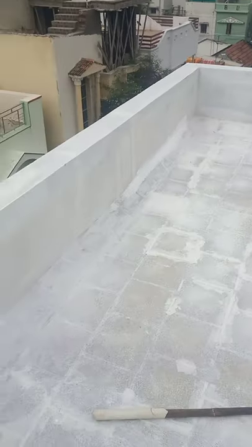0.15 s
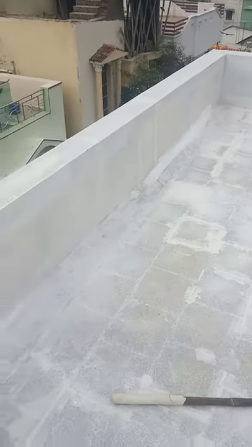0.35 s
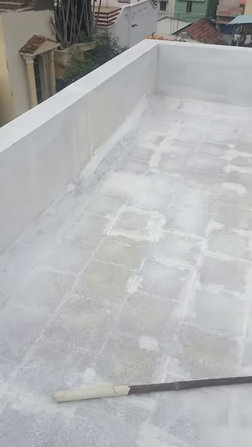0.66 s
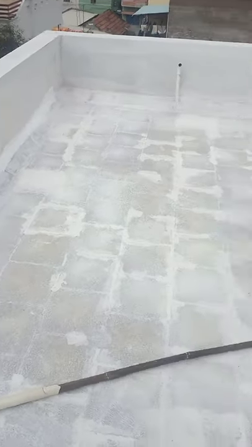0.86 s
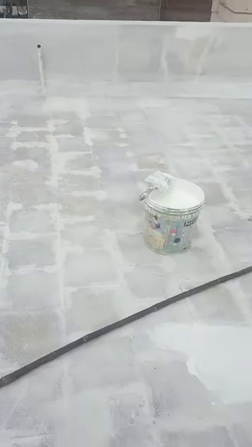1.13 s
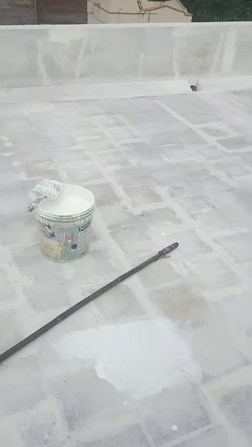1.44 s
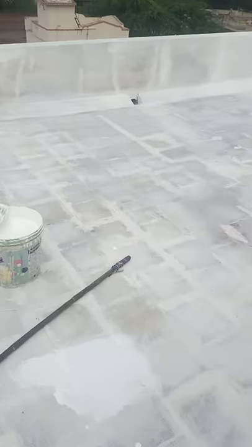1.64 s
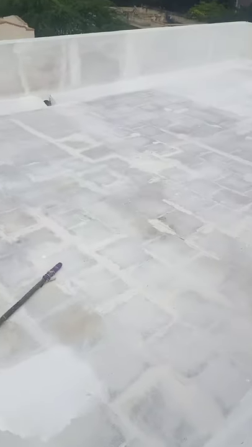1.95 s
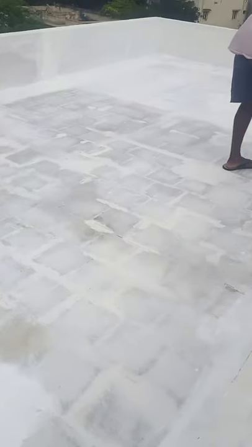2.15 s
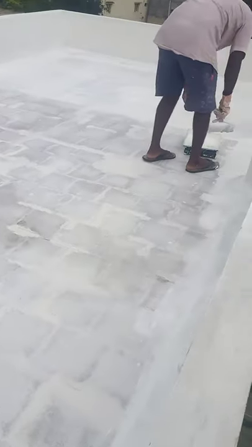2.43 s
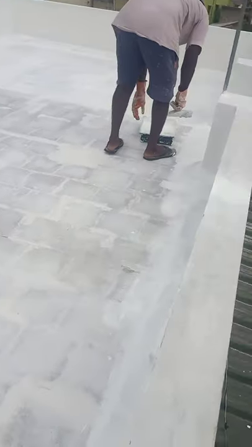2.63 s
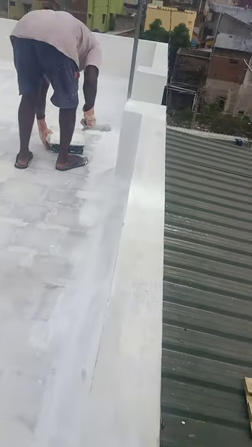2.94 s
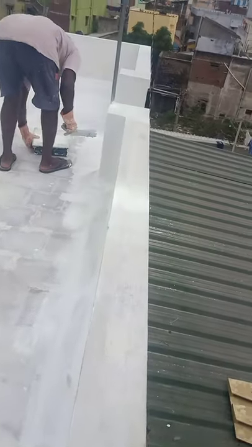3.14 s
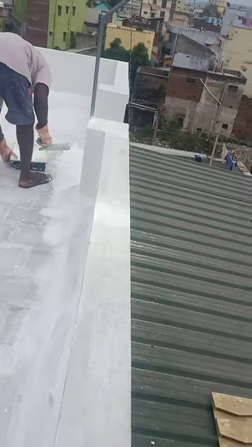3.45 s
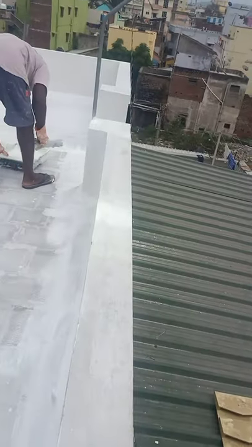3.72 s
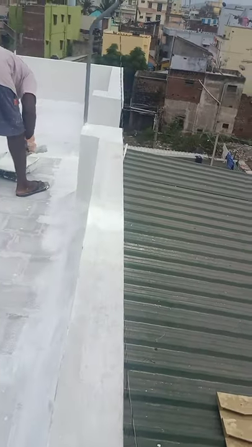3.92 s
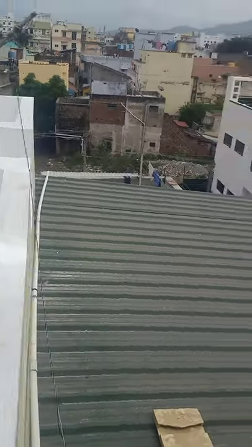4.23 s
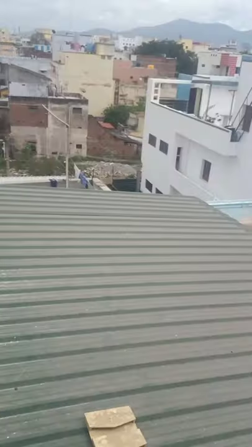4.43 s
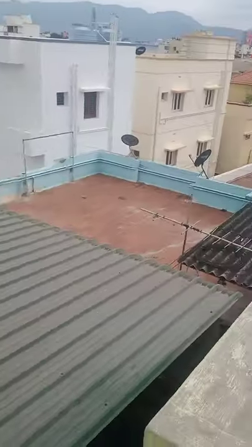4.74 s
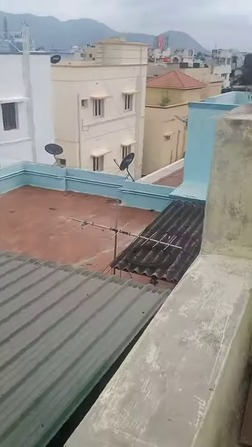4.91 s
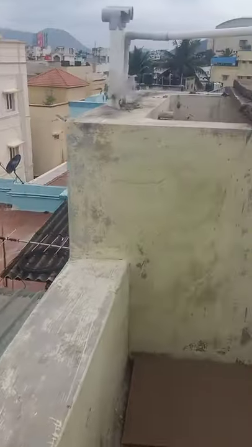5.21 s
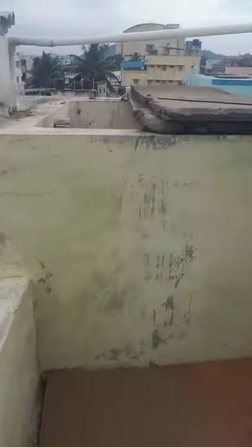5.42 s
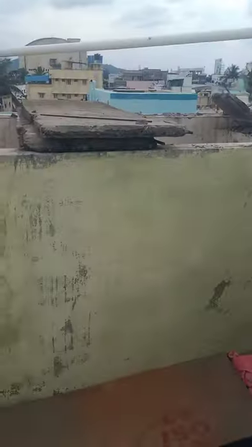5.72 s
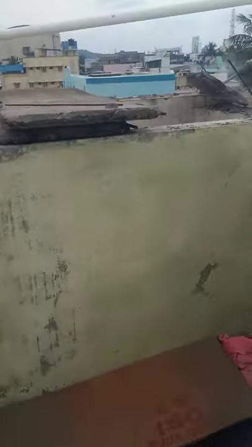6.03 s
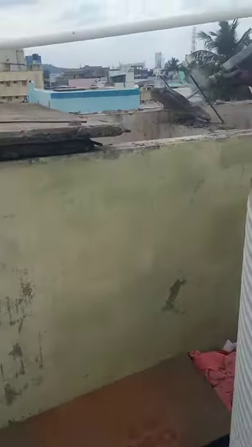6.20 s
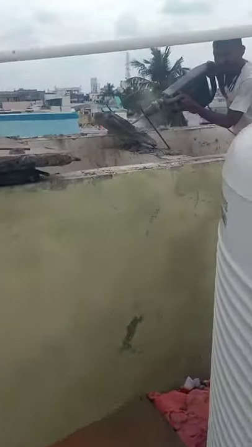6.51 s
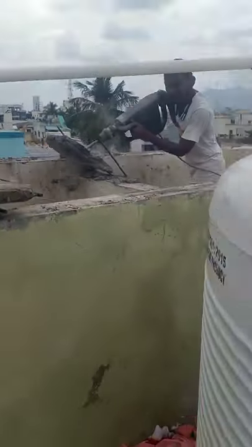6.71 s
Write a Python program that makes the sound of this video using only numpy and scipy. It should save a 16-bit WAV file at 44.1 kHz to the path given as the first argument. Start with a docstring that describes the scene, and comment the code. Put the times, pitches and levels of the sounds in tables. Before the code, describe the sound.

On a rooftop, a motor idles over a low traffic rumble and one faint bird chirp. An electric demolition hammer then chisels concrete nearby in a rapid burst of cracking, thumping blows. It drops back to a whirr, with a few dull footsteps and stray rattling strikes, before a second burst with a brighter steel ring fades away. The microphone moves across the roof, and walls throw back short echoes.

```python
"""An idling motor whirrs over a low traffic rumble and one bird chirp; then an electric demolition hammer
chisels concrete on a nearby roof, in two bursts with a few stray blows between. Each blow cracks,
thumps the slab and rings the steel chisel; gears, piston and fan run on and grow louder under load.
The listener crosses the roof with a few dull footfalls and turns from side-on to face the hammer.
Parapets and houses throw the sound back."""
import sys
import numpy as np
from scipy import signal
from scipy.fft import rfft, irfft, next_fast_len
from scipy.io import wavfile
from scipy.ndimage import uniform_filter1d, minimum_filter1d, map_coordinates

SR = 44100
rng = np.random.default_rng(int(sys.argv[2]) if len(sys.argv) > 2 else 0)


def put_to_file(sound):
    """Save the sound as 16-bit audio at rate SR, in the file named by the first command-line argument."""
    columns = np.atleast_2d(sound).T  # one column per channel
    safe = np.clip(columns, -1, 1)
    whole_steps = np.round(safe * 32767)
    wavfile.write(sys.argv[1], SR, whole_steps.astype(np.int16))


N = 302526
T = np.arange(N) / SR
CRANK_HZ, SHOCK_LAG_S = 24.3, 0.0007

# Table levels are relative; each source adds its own gain.
# blows (time [s], crack [dB], slab thump [dB], steel ring [dB], extra on top steel modes [dB])
BLOWS = [(1.1821, -15, -23.5, -39, 2), (1.2229, -15, -16.5, -29.5, -7), (1.263, -14, -13.5, -33, 0),
         (1.515, -19.5, -19, -35, -7), (1.553, -13.5, -13, -26.5, -4), (1.635, -12, -12, -30, -9),
         (1.6758, -7, -14.5, -25, -5.5), (1.7615, -10.5, -16, -39, -2.0), (1.7987, -5, -13.5, -31.5, 2),
         (1.881, -5.5, -12, -35, 1), (1.9644, -3, -13, -26, -7), (2.004, -3.5, -12.5, -35, 7),
         (2.0451, -3, -13.5, -35, 0.0), (2.0871, -4.5, -14.5, -28, 3), (2.1292, -5, -14, -34, 3),
         (2.1702, -5.5, -18, -23, -7), (2.2106, -4, -15.5, -37, 5), (2.2532, -7, -20.5, -38, 4),
         (2.2932, -4, -19, -38, -5), (2.3356, -6.5, -17.5, -32, -2), (2.3759, -5.5, -17, -35, -6),
         (2.4163, -5, -17.5, -30, -5), (2.4584, -6, -25, -27, -5), (2.5002, -7, -22, -28, -12),
         (2.5434, -11.5, -19, -31, -5), (2.5833, -9.5, -23, -31.5, 2), (2.6248, -9, -25, -35, 10),
         (2.6663, -11.5, -23, -39, 7), (2.7078, -12.0, -24, -34, 0), (2.7502, -16, -27, -31, -2),
         (2.805, -23.5, -56, -44.0, -2), (4.0269, -18, -45, -60.0, -5.0), (4.0648, -17, -52, -44, -4),
         (4.1074, -12, -22.5, -43.0, 4), (4.15, -8, -28, -26, 5), (4.1995, -27, -38, -34, 0),
         (4.265, -21.5, -37, -32.5, 2), (5.314, -16.5, -52, -22, -6), (5.3821, -11, -19.5, -22.5, -3),
         (5.4252, -9, -20, -20.5, 1), (5.4656, -8.5, -17.5, -18.5, -1), (5.505, -6, -16, -18.5, 3),
         (5.5465, -7.5, -17, -16, -3), (5.5876, -4, -18.5, -24, 8), (5.6282, -5.5, -19, -19.5, 3.5),
         (5.6707, -8, -20, -22.5, 2.5), (5.7118, -5, -21.5, -25.5, 2), (5.7525, -9.5, -19, -20.5, 3),
         (5.7937, -8, -17, -19, 5.0), (5.8382, -10.5, -18.5, -22.5, -3), (5.8765, -7, -18, -15.5, -3),
         (5.917, -6.5, -19.5, -24, 3), (5.9579, -7, -20.5, -23.5, 4), (5.9995, -5.5, -19.5, -20, -2),
         (6.0405, -5.5, -22, -22, -3), (6.0817, -5.5, -21.5, -21, -1), (6.1238, -6.5, -23, -23.5, 2),
         (6.165, -6.5, -26, -30, 3.0), (6.2059, -6.5, -24, -26.5, -1), (6.2478, -7.5, -25.5, -28, -2),
         (6.289, -8.5, -27, -31, -3), (6.3302, -8, -25, -30, -3), (6.372, -11, -26, -35, 4),
         (6.4126, -13.5, -30, -26.5, -4), (6.4544, -13.5, -29, -30, -6), (6.4951, -15, -38, -35, 0),
         (6.5374, -17.5, -29, -31.5, -1.0), (6.5783, -17, -32, -30, 1), (6.6204, -16.5, -37, -34, 7),
         (6.6589, -21, -43, -33, 1), (6.7021, -23.5, -38, -36, 1), (6.744, -21.5, -40, -36, -2),
         (6.786, -22.5, -39, -37, 1), (6.8236, -18, -44, -37, 0)]
# direct shock, side-on and facing (frequency [Hz], level [dB])
SHOCK_SIDE = [(30, -49), (150, -15), (600, -4), (1200, -0.5), (2000, 0.5), (2700, -2), (3400, -24),
              (5500, -23), (6600, -12), (8200, -42), (15500, -60)]
SHOCK_FRONT = [(30, -53), (150, -17.5), (500, -4), (780, 1), (1050, -3), (1500, -8), (2000, -7),
               (2800, -4.5), (3400, -8), (4200, -18), (6600, -12), (8200, -33), (15500, -48)]
# shock gain, highest where the path is clear (time [s], gain [dB])
SHOCK_PATH = [(1.2, 12.5), (2, 8.5), (2.3, 4), (2.45, 12.5), (2.62, 15.5), (2.75, 11), (4.1, 6), (4.15, 10),
              (4.26, 4), (5.4, 5), (5.8, 6.5), (6.05, 8), (6.2, 12), (6.35, 12), (6.8, 0.5)]
# crack, side-on and facing (frequency [Hz], level [dB])
CRACK_SIDE = [(100, -48), (400, -6), (800, 1.5), (1100, 5), (1450, -3), (2000, -2), (2800, 0.5),
              (3600, -13.5), (5000, -16), (7000, -23), (8200, -51), (11000, -36.5), (15500, -68)]
CRACK_FRONT = [(100, -53), (400, -10), (780, 8), (1100, 2), (1400, 6.5), (1850, 7), (2300, 2.5), (2750, 6),
               (3400, -1.5), (4100, -9), (6800, -4), (8200, -23.5), (11000, -37), (15500, -35)]
# hollow note knocked out by each snap (time [s], pitch [Hz], gain [dB])
CLANK_NOTE = [(1.2, 630, 0), (1.7, 565, -4), (2.1, 620, -13), (2.6, 1040, -13), (4.1, 1060, -5),
              (5.4, 920, 2.5), (5.7, 890, 1.5), (5.88, 880, 1), (6.03, 750, -2.5), (6.35, 770, -3),
              (6.8, 930, -3)]
# slab and wall modes, side-on and facing (frequency [Hz], level [dB], t60 [s])
SLAB_MODES_SIDE = [(145, -17, .13), (245, -11, .09), (382, -7, .08), (455, -6, .09), (488, -8, .08),
                   (560, -4, .075), (605, -4, .07), (672, -10, .07), (772, -7, .08), (980, -3, .045),
                   (1120, -3, .08), (1285, -8, .05), (1455, -8, .07), (1718, -6, .07), (2260, -8, .06),
                   (2735, -9, .05)]
SLAB_MODES_FRONT = [(145, -13, .13), (216, -8, .08), (243, -2.5, .08), (342, -4, .08), (460, -5, .08),
                    (530, -9, .07), (652, -5, .06), (735, -6, .06), (775, -2, .035), (890, -5, .03),
                    (950, -4, .03), (1230, -3, .06), (1510, -9, .07), (1795, -5, .05), (1950, -6, .045),
                    (2370, -10, .045), (2690, -8, .04)]
# wall thud (level [dB], start pitch [Hz], floor pitch [Hz], envelope centre [s], width [s])
THUD_SIDE, THUD_FRONT = (-6, 350, 190, -0.2, 0.08), (-9, 330.5, 205.5, 0.28, 0.6)
# steel modes (frequency [Hz], level [dB], t60 [s])
CHISEL_MODES = [(5167, -7, .045), (5550, -9, .02), (5695, 1, .05), (5890, -5, .025), (6490, -4, .03),
                (6700, -3, .025), (6950, -10, .018), (8450, -24, .02), (9080, -7, .04), (10100, -15, .032),
                (10330, -24, .018), (11350, -28, .015), (13020, -16.5, .043), (13800, -25, .02),
                (14550, -26, .02)]
# chisel loose in its holder (time [s], level [dB], width [s], pitch [Hz])
RATTLES = [(1.333, -35, 0.0084, 620), (1.547, -28, 0.0055, 1000), (1.635, -26, 0.0049, 1000),
           (1.67, -21.5, 0.0045, 1050), (1.721, -35, 0.0045, 895), (1.76, -24, 0.0066, 1000),
           (1.792, -26, .006, 1050), (1.848, -23, 0.0061, 950), (1.879, -27, .005, 1050),
           (1.925, -30, 0.0065, 1090), (1.96, -21, 0.004, 1010), (4.104, -24, 0.0057, 995),
           (4.184, -25.5, .014, 1090), (4.246, -28, 0.0087, 850), (4.281, -25, 0.014, 1150),
           (4.304, -27.5, 0.0055, 700), (4.346, -33, 0.0044, 850), (4.359, -26.5, 0.0051, 850),
           (4.4, -27.5, .006, 1000), (4.441, -29.5, 0.0071, 800), (4.481, -27.5, 0.0087, 790),
           (4.524, -30.5, 0.0042, 740), (4.564, -31, .005, 1200), (4.644, -32, 0.0062, 756),
           (4.68, -29.5, 0.0072, 720)]
# tip skidding and grinding (frequency [Hz], level [dB])
SKID_SPECTRUM = [(6000, -2), (7400, 12.5), (8300, -1), (9100, 2), (9700, -10), (10200, -4), (11200, -12.5),
                 (12200, -21), (13100, -9), (13900, -5), (15500, -11)]
GRIND_SPECTRUM = [(500, -14), (1000, 3), (1500, -21), (2000, -6), (4000, 10.5), (5700, 8.5), (6800, 12),
                  (8000, -10.5), (9200, -23), (10300, -12), (12000, -29), (14000, -17), (15500, -23)]
# unloaded machine (time [s], whirr [dB], hum [dB], fan hiss [dB])
IDLE_LEVELS = [(0, -36, -51, -52.5), (.5, -35.5, -54, -50.5), (.85, -34.5, -50.5, -46),
               (1.4, -32.5, -37.5, -43.5), (2.9, -39, -71, -48), (3.65, -37, -49.5, -44.5),
               (3.9, -36.5, -55, -43.5), (4.02, -34, -69, -44), (4.17, -28.5, -53, -36.5),
               (4.35, -32, -39.5, -39), (4.65, -32, -42.5, -41.5), (4.9, -31, -36, -35.5),
               (5.27, -30.5, -42.5, -35.5), (5.55, -26, -35.5, -39), (6, -28.5, -45, -45),
               (6.55, -40, -51, -42), (6.86, -35.5, -77, -46.5)]
# noise added by load, side-on and facing (whirr [dB], hum [dB], fan hiss [dB])
LOAD_SIDE_DB, LOAD_FRONT_DB = (-15, -22, -30.5), (-19, -30, -53)
# gear whirr: idling far, idling near, loaded, facing (frequency [Hz], level [dB])
WHIRR_FAR = [(240, -67), (400, -21), (539, -2.5), (600, -10), (706, -2), (1200, -6), (1630, -9.5),
             (1780, -10), (2120, -12.5), (2380, -14), (3700, -20), (4000, -19.5), (5200, -32.5),
             (8800, -120)]
WHIRR_NEAR = [(240, -47), (400, -8), (485, -65), (514, -10), (648, 2.5), (925, -3), (1120, 5.5),
              (1360, -1.5), (1820, 1), (3400, -5.5), (4000, -11), (5200, -17.5), (8800, -120)]
WHIRR_LOADED = [(240, -11), (400, -6.5), (499, -34), (611, 5), (785, -12), (980, 1), (1130, -4.5),
                (1300, -2), (1620, -4), (2300, -4.5), (2900, -7.5), (3300, -17), (4000, -18), (5200, -38),
                (8800, -120)]
WHIRR_FRONT = [(240, -60), (400, -39), (453, -8.5), (588, -5.5), (660, -1), (780, 0), (900, -2),
               (1130, 1.5), (1300, -2), (1500, -2), (1600, -11.5), (1850, 3), (2270, -4.5), (3000, -5),
               (4000, -9), (5200, -21), (8800, -120)]
# machine hum, side-on and facing (frequency [Hz], level [dB])
HUM_SIDE = [(20, -49), (45, -65), (72, -6), (86, -3.5), (110, 0), (160, 1.5), (240, 5), (290, 2.5),
            (400, 3), (550, 6.5), (800, -44.5)]
HUM_FRONT = [(20, -60), (50, -50), (73, -34), (100, -32), (125, -14), (145, 2), (180, 2), (240, 10),
             (290, 2), (350, 5.5), (450, 5.5), (800, -48)]
# cooling fan, rush and top fizz (frequency [Hz], level [dB])
FAN_HISS = [(2200, 5.5), (3200, 14.5), (3700, -3), (4700, 3.5), (5500, -0.5), (6200, 3), (6700, 4),
            (7300, -7.5), (7900, -20.5), (9000, -60)]
FAN_FIZZ = [(6500, -30), (8000, 0), (9100, 1), (9700, -5), (10200, 0), (11500, -6), (13000, -4),
            (15500, -9)]
# heel and sole impacts (time [s], level [dB], boom [Hz], t60 [s])
FOOTFALLS = [(1.078, -31, 230, 0.1), (3.465, -21.5, 327, 0.14), (3.49, -21.5, 200, 0.1),
             (3.556, -30.5, 160, 0.081), (4.304, -23.5, 310, 0.079), (4.767, -11, 556, 0.082),
             (4.773, -13, 503, 0.12), (4.778, -24.5, 219, 0.19), (4.8, -17, 483, 0.073),
             (4.931, -19.5, 530, 0.026), (5.09, -24, 352, 0.071)]
# sole on grit (time [s], level [dB], decay [s])
SCUFFS = [(3.469, -25.5, 0.014), (3.477, -28.5, 0.034)]
# crunch of grit (frequency [Hz], level [dB])
SCUFF_SPECTRUM = [(300, -16), (700, 2), (1300, 5), (2500, -5), (3700, -5), (5200, -14), (7000, -25),
                  (8500, -44), (15500, -49)]
# bird note (time [s], pitch [Hz], level [dB])
CHIRP = [(.51, 3630, -83), (.525, 3640, -36.5), (.545, 3587, -33.5), (.565, 3644, -62), (.6, 3560, -84)]
# far traffic (time [s], level [dB])
TRAFFIC_LEVEL = [(0, -56), (.27, -57), (.4, -46), (.75, -42.5), (1.2, -50.5), (3.2, -56), (3.65, -54),
                 (3.92, -75), (4.2, -45), (4.8, -57.5), (6.86, -94)]
# its rumble (frequency [Hz], level [dB])
TRAFFIC_SPECTRUM = [(20, -26), (45, -39), (70, 2.5), (105, 13), (160, 1), (212, 12.5), (270, -28.5),
                    (400, -61.5)]
# nearest wall echoes (delay [s], level [dB], cutoff [Hz])
SLAPS = [(.0088, -5, 910), (0.0171, -11.5, 3150)]
# echo of the surrounding walls (frequency [Hz], t60 [s])
WALL_DECAY = [(150, 0.25), (600, 0.66), (2500, 0.35), (6000, 0.037), (12000, 0.2)]
# listener's heading (time [s], left lag [ms], left minus right [dB])
HEADING = [(0, -0.13, -1.5), (1.2, -0.21, -0.5), (1.7, -0.032, 0.9), (2.6, -0.047, -1.5), (3.7, -0.035, -3),
           (4.2, 0.044, -1.5), (4.7, 0.18, -2.5), (5.3, 0.19, -2), (6.2, 0.19, -2), (6.86, 0.13, -3)]
# left-right likeness of noise (frequency [Hz], coherence [0-1])
COHERENCE = [(30, 0.3), (130, 1), (350, 0.91), (700, 0.73), (1400, 0.73), (3000, 0.4), (8000, 0.01)]


def gain_of(db):
    """Decibels to amplitude."""
    return 10 ** (np.asarray(db) / 20)


def unit_rms(x):
    """Scales to an rms of one."""
    return x / np.sqrt(np.mean(x ** 2) + 1e-20)


def at_hz(points, hz):
    """Interpolates a spectrum over log frequency."""
    knots_hz, value = np.transpose(points)
    return np.interp(np.log(hz + 1), np.log(knots_hz + 1), value)


def at_time(rows, t):
    """Interpolates every column of a curve at times t."""
    knots_s, *columns = np.transpose(rows)
    return [np.interp(t, knots_s, column) for column in columns]


def add(mix, at_s, sound):
    """Mixes a sound in at a given time."""
    part = mix[:, max(round(at_s * SR), 0):][:, :sound.shape[1]]
    part += sound[:, :part.shape[1]]


def min_phase(points, size=2048):
    """Unit-energy minimum-phase response of a spectrum."""
    log_gain = at_hz(points, abs(np.fft.fftfreq(size, 1 / SR))) * np.log(10) / 20
    taps = np.fft.ifft(np.exp(np.conj(signal.hilbert(log_gain)))).real[:size // 2]
    return taps / np.linalg.norm(taps)


def facing(at_s):
    """Share of the hammer heard from the front, 0-1."""
    return np.clip((at_s - 3.2) / 1.8, 0, 1)


def panned(x, at_s):
    """Left-right delay and balance for the listener's heading."""
    lag_ms, balance_db = at_time(HEADING, at_s)
    side, hz = np.array([[.5], [-.5]]), np.fft.rfftfreq(x.shape[1], 1 / SR)
    delay_s = (side * lag_ms + abs(lag_ms) / 2) / 1000
    return irfft(rfft(x) * np.exp(-2j * np.pi * hz * delay_s), x.shape[1]) * gain_of(side * balance_db)


def cohere(spectra, hz):
    """Blends two independent spectra: alike in the bass, unrelated in the treble."""
    same = np.clip(at_hz(COHERENCE, hz), 0, 1)
    mid, side = spectra[0] * np.sqrt((1 + same) / 2), spectra[1] * np.sqrt((1 - same) / 2)
    return np.array([mid + side, mid - side])


def coloured(x, points):
    """Shapes a noise pair to a spectrum, at unit rms."""
    size = next_fast_len(x.shape[1])
    hz = np.fft.rfftfreq(size, 1 / SR)
    spectra = cohere(rfft(x, size), hz) * gain_of(at_hz(points, hz))
    return unit_rms(irfft(spectra, size)[:, :x.shape[1]])


def whitened(x, bins):
    """Flattens a burst's broad spectrum, at about unit energy."""
    spectra = rfft(x)
    power = uniform_filter1d(abs(spectra) ** 2, bins, axis=-1)
    return irfft(spectra / np.sqrt(power + 1e-12), x.shape[-1])


def flicker(size, depth_db, smooth_samples):
    """Randomly fluctuating gain."""
    return gain_of(depth_db * unit_rms(uniform_filter1d(rng.standard_normal(size), smooth_samples)))


def ring(modes, t, phase_turns, spread_db, rise_cycles, late_cycles=0):
    """Struck modes that build and decay, each at a slightly random strength."""
    hz, db, t60_s = np.transpose(modes)[:, :, None]
    strength = gain_of(db + spread_db * np.clip(rng.standard_normal(hz.shape), -2, 2))
    age_s = np.maximum(t - late_cycles / hz, 0)
    envelope = strength * np.exp(-np.log(1000) * age_s / t60_s) * (1 - np.exp(-age_s * hz / rise_cycles))
    return (np.exp(2j * np.pi * phase_turns[..., 0]) @ (envelope * np.exp(2j * np.pi * hz * t))).imag


def shocks():
    """Each blow's direct wave: one hard snap ahead of its reflections."""
    out, side, front = np.zeros((2, N)), min_phase(SHOCK_SIDE), min_phase(SHOCK_FRONT)
    for at_s, db, *_ in BLOWS:
        snap = -((1 - facing(at_s)) * side + facing(at_s) * front)
        gain = gain_of(db + at_time(SHOCK_PATH, at_s)[0])
        add(out, at_s + SHOCK_LAG_S, gain * panned(np.array([snap, snap]), at_s))
    return out


def cracks(gain_db=15.5, gap_s=0.0012, decay_s=0.003, scatter_db=-19, scatter_s=0.035, drift=0.22):
    """A sharp crack and a spray of near reflections whose pattern drifts as the listener moves."""
    t, out = np.arange(4096) / SR - .003, np.zeros((2, N))
    side, front, age_s = min_phase(CRACK_SIDE), min_phase(CRACK_FRONT), np.maximum(t, 0)
    pattern = rng.standard_normal((3, len(t)))  # common, left, right
    for at_s, db, *_ in BLOWS:
        pattern = unit_rms(pattern + drift * rng.standard_normal(pattern.shape))
        paths = (pattern + 0.29 * rng.standard_normal(pattern.shape)) * (t > gap_s)
        direct = (paths[0] + 0.63 * paths[1:]) * np.exp(-age_s / decay_s)
        scatter = (0.51 * paths[0] + paths[1:]) * gain_of(scatter_db) * np.exp(-age_s / scatter_s)
        colour = (1 - facing(at_s)) * side + facing(at_s) * front
        burst = signal.fftconvolve(whitened(direct + scatter, bins=72), colour[None], axes=1)
        add(out, at_s + t[0], gain_of(db + gain_db) * panned(burst, at_s))
    return out


def clank(t60_s=0.014, overtone_ratio=2.68, overtone_db=-9, detune=0.053):
    """Each snap knocks out a short, hollow note whose pitch shifts as the listener moves."""
    t, out = np.arange(SR // 16) / SR, np.zeros((2, N))
    phase_turns = np.full((2, 2, 1), 3 / 4)
    for at_s, db, *_ in BLOWS:
        hz, note_db = at_time(CLANK_NOTE, at_s)
        modes = [(hz, 0, t60_s), (hz * overtone_ratio, overtone_db, t60_s / 2)]
        speed = 1 + detune * rng.standard_normal()
        knock = ring(modes, t * speed, phase_turns, spread_db=0.6, rise_cycles=0.31)
        add(out, at_s + SHOCK_LAG_S, gain_of(db + note_db) * panned(knock, at_s))
    return out


def slab(gain_db=-5.5, jitter_turns=0.041):
    """The concrete thumps much alike at each blow; slow bending waves bring the low modes last."""
    t, out = np.arange(SR // 6) / SR, np.zeros((2, N))
    for modes, late_cycles, in_front in (SLAB_MODES_SIDE, 0.34, False), (SLAB_MODES_FRONT, 2.13, True):
        phase_turns = rng.random((len(modes), 1)) + 0.046 * rng.standard_normal((2, len(modes), 1))
        for at_s, _, db, *_ in BLOWS:
            if (facing(at_s) > .5) == in_front:
                jittered = phase_turns + jitter_turns * rng.standard_normal((len(modes), 1))
                thump = ring(modes, t, jittered, spread_db=2, rise_cycles=0.33, late_cycles=late_cycles)
                add(out, at_s, gain_of(db + gain_db) * panned(thump, at_s))
    return out


def bending_wave(side_db=-2.5, front_db=-4.5, top_hz=1250, floor_hz=190, fall_hz_per_s=62000):
    """High notes cross the wall fastest, so each blow trails a brief falling knock."""
    t, out = np.arange(SR // 24) / SR, np.zeros((2, N))
    turns = np.cumsum(np.maximum(top_hz - fall_hz_per_s * t, floor_hz)) / SR
    swell = np.exp(-((t - 0.012) / 0.0036) ** 2)
    for at_s, _, db, *_ in BLOWS:
        knock = swell * np.sin(2 * np.pi * turns * (1 + 0.006 * rng.standard_normal()))
        gain = gain_of(db + side_db + (front_db - side_db) * facing(at_s))
        add(out, at_s, gain * panned(np.array([knock, knock]), at_s))
    return out


def wall_thuds(sink_s=0.019):
    """The wall gives with a sinking thud, near silent side-on; in a burst the thuds merge to a buzz."""
    t, out = np.arange(SR // 20) / SR, np.zeros((2, N))
    for at_s, _, db, *_ in BLOWS:
        gain_db, top_hz, floor_hz, centre_s, width_s = THUD_FRONT if facing(at_s) > .5 else THUD_SIDE
        turns = np.cumsum(floor_hz + (top_hz - floor_hz) * np.exp(-t / sink_s)) / SR
        thud = np.exp(-((t - centre_s) / width_s) ** 2) * np.sin(2 * np.pi * turns)
        add(out, at_s, gain_of(db + gain_db) * thud[None])
    return out


def chisel(seat_db=-17, strike_db=-3.5, bounce_db=-13, detune=0.0063, top_hz=8000, damping_db=2):
    """The steel rings as it seats, is struck and bounces; the hole grips it differently each blow."""
    t, out = np.arange(SR // 10) / SR, np.zeros((2, N))
    hz, db, t60_s = np.transpose(CHISEL_MODES)
    for at_s, _, _, steel_db, top_db in BLOWS:
        lead_s, lag_s = rng.uniform(0.0031, 0.015), rng.uniform(0.0034, 0.0059)
        grip = np.clip(rng.standard_normal((2, len(hz))), -2, 2)
        modes = np.column_stack([hz * (1 + detune * grip[0]),
                                 db + top_db * (hz > top_hz),
                                 t60_s * gain_of(damping_db * grip[1])])
        for offset_s, contact_db in (-lead_s, seat_db), (0, strike_db), (lag_s, bounce_db):
            phase_turns = rng.random((len(hz), 1)) + 0.18 * rng.standard_normal((2, len(hz), 1))
            steel = ring(modes, t, phase_turns, spread_db=2.7, rise_cycles=4.7)
            chatter = unit_rms(flicker(len(t), depth_db=2, smooth_samples=90))
            add(out, at_s + offset_s, gain_of(steel_db + contact_db) * panned(steel * chatter, at_s))
    return out


def rattles():
    """The loose chisel clatters in its holder when the striker misses or is about to catch."""
    t, out = np.arange(-SR // 20, SR // 20) / SR, np.zeros((2, N))
    for at_s, db, width_s, hz in RATTLES:
        colour = [(hz / 3, -35), (hz / 1.7, -8), (hz, 0), (hz * 1.3, -7),
                  (3000, -15), (6500, -28), (9000, -65)]
        clatter = coloured(rng.standard_normal((2, len(t))), colour) * np.exp(-(t / width_s) ** 2 / 2)
        add(out, at_s + t[0], gain_of(db) * panned(clatter, at_s))
    return out


def skids(gain_db=-15, decay_s=0.0044, spread_db=4.5, top_share=0.6):
    """The tip skids on stone: a short metallic splash, coloured anew at each blow."""
    t, out = np.arange(SR // 20) / SR, np.zeros((2, N))
    hz = np.linspace(5000, 16000, 45)
    for at_s, _, _, steel_db, top_db in BLOWS:
        band_db = at_hz(SKID_SPECTRUM, hz) + spread_db * rng.standard_normal(len(hz))
        colour = [(4000, -40), *zip(hz, band_db)]
        splash = coloured(rng.standard_normal((2, len(t))), colour) * np.exp(-t / decay_s)
        add(out, at_s, gain_of(steel_db + top_share * top_db + gain_db) * panned(splash, at_s))
    return out


def grinding(gain_db=-3, rise_s=0.0024, decay_s=0.0099):
    """The tip grinds into the concrete just before and after each blow."""
    t, pressure = np.arange(-SR // 50, SR // 25) / SR, np.zeros((1, N))
    push = np.exp(np.where(t < 0, t / rise_s, -t / decay_s))
    for at_s, _, _, steel_db, _ in BLOWS:
        add(pressure, at_s + t[0], gain_of(steel_db + gain_db) * push[None])
    grit = unit_rms(flicker(N, depth_db=4, smooth_samples=40))
    return pressure * coloured(rng.standard_normal((2, N)) * grit, GRIND_SPECTRUM)


def chips(peak_per_s=90, settle_s=0.15, gain_db=-19, spread_db=4, decay_s=0.00037):
    """Concrete crumbs tick about, thinning out after each blow."""
    blow_s, _, _, steel_db, _ = np.transpose(BLOWS)
    since_s = abs(T - blow_s[np.searchsorted(blow_s, T) - 1])
    lands = rng.random(N) < peak_per_s / SR * np.exp(-since_s / settle_s)
    size_db = spread_db * np.minimum(rng.exponential(1, N), 3)
    impacts = lands * gain_of(np.interp(T, blow_s, steel_db) + gain_db + size_db)
    t = np.arange(256) / SR
    colour = [(1500, -13), (4000, 7), (6700, 8), (8200, -17), (10000, -11), (15500, -30)]
    tick = coloured(rng.standard_normal((2, len(t))), colour) * np.exp(-t / decay_s)
    return signal.oaconvolve(impacts[None], tick, axes=1)[:, :N]


def crank_turns(blow_s):
    """Crank position: it keeps running between blows, and each blow falls on a whole turn."""
    turns = np.concatenate([[0], np.cumsum(np.round(np.diff(blow_s) * CRANK_HZ))])
    return np.interp(T, blow_s, turns) + np.minimum(T - blow_s[0], 0) * CRANK_HZ


def running_strength(blow_s, db, smooth_s=0.048, release_s=0.028):
    """Running rms of the blows: builds as they crowd, dies when they stop."""
    power, half = np.zeros(N), round(smooth_s * SR)
    power[(blow_s * SR).astype(int)] = gain_of(db) ** 2 * SR / CRANK_HZ
    mean = signal.oaconvolve(power, signal.get_window("hann", 2 * half) / half, "same")
    pole = np.exp(-1 / (release_s * SR))
    return np.sqrt(abs(signal.lfilter([1 - pole], [1, -pole], mean)))


def crank_noise(turns, repeat_share):
    """Mechanism noise, part of which repeats with every crank turn."""
    size = round(SR / CRANK_HZ)
    cycle = unit_rms(whitened(rng.standard_normal((2, size)), bins=3))
    looped = cycle[:, (turns % 1 * size).astype(int) % size]
    return np.sqrt(repeat_share) * looped + np.sqrt(1 - repeat_share) * rng.standard_normal((2, N))


def motor(whirr_db=1, hum_db=1, hiss_db=1.5, fizz_db=-47.5, early_fizz_cut_db=-25,
          lull_db=3, load_exponent=1.75):
    """Gears, piston and fan: rattling noise that throbs with the stroke and grows with load."""
    blow_s, crack_db, thump_db, *_ = np.transpose(BLOWS)
    turns = crank_turns(blow_s)
    load, shake = running_strength(blow_s, crack_db), running_strength(blow_s, thump_db)
    effort = load / load.max()
    stroke_db = 0.56 * np.cos(2 * np.pi * turns) - 0.65 * np.cos(4 * np.pi * turns - .8)
    drawback_db = -lull_db * effort * np.cos(np.pi * (turns + 0.32)) ** 2
    throb = gain_of(stroke_db + drawback_db) * flicker(N, depth_db=3, smooth_samples=70)
    drive = crank_noise(turns, repeat_share=np.interp(effort, [0, 0.5], [0.32, 0.64]))
    gears, air = drive * throb, rng.standard_normal((2, N)) * throb

    far, front = np.interp(T, [1, 1.9], [1, 0]), np.interp(T, [3.95, 4.3], [0, 1])
    side = 1 - front
    load_db = np.outer(LOAD_SIDE_DB, side) + np.outer(LOAD_FRONT_DB, front)
    load_gains = gain_of(load_db) * [load ** load_exponent, shake, load]
    whirr_gain, hum_gain, fan_gain = np.hypot(gain_of(at_time(IDLE_LEVELS, T)), load_gains)
    loaded_share = side * (load_gains[0] / whirr_gain) ** 2

    whirr = far * coloured(gears, WHIRR_FAR) + (side - far) * coloured(gears, WHIRR_NEAR)
    whirr += front * coloured(gears, WHIRR_FRONT)
    whirr = (1 - loaded_share) * whirr + loaded_share * coloured(gears, WHIRR_LOADED)
    hum = side * coloured(drive, HUM_SIDE) + front * coloured(drive, HUM_FRONT)
    fan = gain_of(hiss_db) * coloured(air, FAN_HISS)
    # faint top fizz, nearly absent until about 4 s
    fan += gain_of(fizz_db + early_fizz_cut_db * side) * coloured(air, FAN_FIZZ)
    out = whirr_gain * gain_of(whirr_db) * whirr + hum_gain * gain_of(hum_db) * hum + fan_gain * fan

    lag_ms, balance_db = at_time(HEADING, T)
    out[0] = map_coordinates(out[0], [np.arange(N) - lag_ms * SR / 1000], order=3, mode="nearest")
    return out * gain_of(np.array([[.5], [-.5]]) * balance_db)


def wavering(x, depth_db=1.88):
    """Distant noise wavers in time-frequency patches as air and listener move."""
    spectra = signal.stft(x, SR, nperseg=1024, noverlap=768)[2]
    patches = uniform_filter1d(rng.standard_normal(spectra.shape[1:]), size=12, axis=0)
    patches = unit_rms(uniform_filter1d(patches, size=16, axis=1))
    return signal.istft(spectra * gain_of(depth_db * patches), SR, nperseg=1024, noverlap=768)[1][:, :N]


def footfalls(grit_db=-25):
    """A foot lands: a dull boom with a little grit on top."""
    t, out = np.arange(SR // 3) / SR, np.zeros((2, N))
    for at_s, db, hz, t60_s in FOOTFALLS:
        colour = min_phase([(hz / 6, -40), (hz / 2.17, -13), (hz / 0.99, 0), (hz, -1), (hz * 1.55, -12),
                            (hz * 2.7, -23), (hz * 6, grit_db), (6500, -45), (9000, -74)])
        noise = rng.standard_normal((3, len(t)))  # common, left, right
        push = whitened((noise[0] + 0.36 * noise[1:]) * np.exp(-np.log(1000) * t / t60_s), bins=30)
        gain = gain_of(db) * np.sqrt(t60_s * SR / np.log(10 ** 6))
        add(out, at_s, gain * signal.fftconvolve(push, colour[None], axes=1))
    return out


def scuffs(rise_s=0.0014):
    """Grit crunches briefly under a sole."""
    t, out = np.arange(SR // 6) / SR, np.zeros((2, N))
    for at_s, db, decay_s in SCUFFS:
        crunch = coloured(rng.standard_normal((2, len(t))), SCUFF_SPECTRUM)
        add(out, at_s, gain_of(db) * crunch * np.minimum(t / rise_s, 1) * np.exp(-t / decay_s))
    return out


def bird():
    """One thin, slightly falling note."""
    hz, db = at_time(CHIRP, T)
    gate = (T > CHIRP[0][0]) * (T < CHIRP[-1][0])
    return gain_of(db) * np.sin(2 * np.pi * np.cumsum(hz) / SR) * gate


def traffic(surge_db=1.5):
    """Low, uneven rumble from the streets."""
    surge = unit_rms(uniform_filter1d(uniform_filter1d(rng.standard_normal(N), size=2500), size=2500))
    rumble = coloured(rng.standard_normal((2, N)), TRAFFIC_SPECTRUM)
    return gain_of(at_time(TRAFFIC_LEVEL, T)[0] + surge_db * surge) * rumble


def with_slaps(x):
    """Adds dull, distinct echoes off the nearest walls."""
    hz = np.fft.rfftfreq(N, 1 / SR)
    echoes = sum(gain_of(db) * np.exp(-2j * np.pi * hz * delay_s) / (1 + 1j * hz / cutoff_hz) ** 2
                 for delay_s, db, cutoff_hz in SLAPS)
    return irfft(rfft(x) * (1 + echoes), N)


def wall_echo(x, echoes_per_s=1800, first_s=0.012):
    """Sparse echoes off parapets and houses; the midrange lasts longest."""
    size = SR // 2
    taps = rng.standard_normal((2, size)) * (rng.random((2, size)) < echoes_per_s / SR)
    hz, t, spectra = signal.stft(taps * (T[:size] > first_s), SR, nperseg=256)
    decay = np.exp(-np.log(1000) * t / at_hz(WALL_DECAY, hz)[:, None])
    tail = signal.istft(cohere(spectra, hz[:, None]) * decay, SR, nperseg=256)[1]
    return signal.fftconvolve(x, tail / np.linalg.norm(tail[0]), axes=1)[:, :N]


def scene(echo_db=-12, step_echo_db=-16):
    """Blows, bird and footfalls with their echo, over motor and traffic."""
    hammer = with_slaps(shocks() + cracks() + clank())
    hammer += slab() + bending_wave() + wall_thuds()
    hammer += rattles() + chisel() + skids() + grinding() + chips()
    distant, feet = hammer + bird(), footfalls() + scuffs()
    echo = wall_echo(gain_of(echo_db) * distant + gain_of(step_echo_db) * feet)
    return distant + feet + echo + wavering(motor()) + traffic()


def record(dry, low_cut_hz=52, high_cut_hz=15700, limiter_samples=90):
    """Microphone bass roll-off, fast limiter at full scale, band limit."""
    thin = signal.sosfilt(signal.butter(4, low_cut_hz, "highpass", fs=SR, output="sos"), dry)
    allowed_gain = minimum_filter1d(1 / np.maximum(abs(thin).max(0), 1), limiter_samples)
    limited = thin * uniform_filter1d(allowed_gain, limiter_samples)
    lowpass = signal.firwin(511, high_cut_hz, window=("kaiser", 9), fs=SR)
    return signal.oaconvolve(limited, lowpass[None], "same")


dry = scene()
out = record(dry)
put_to_file(out)
```